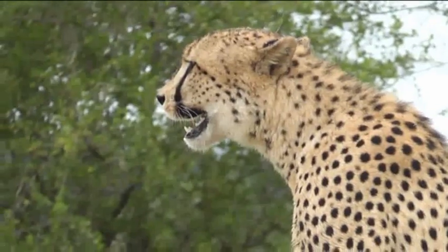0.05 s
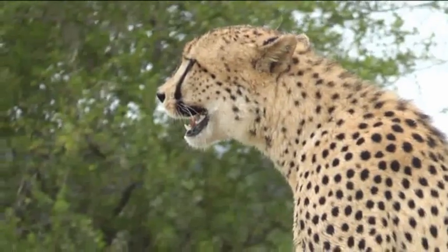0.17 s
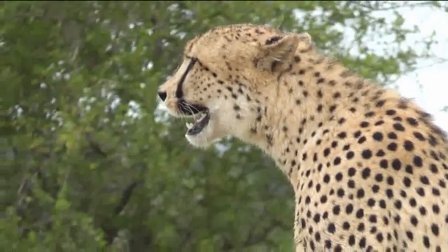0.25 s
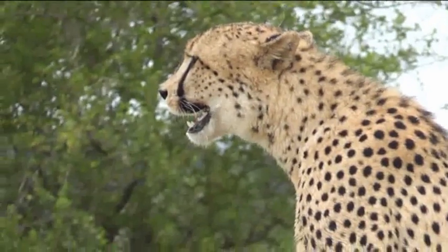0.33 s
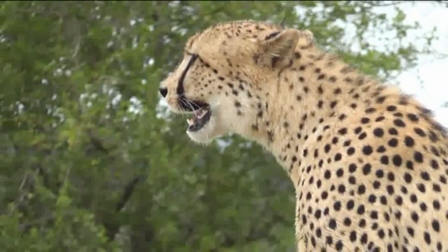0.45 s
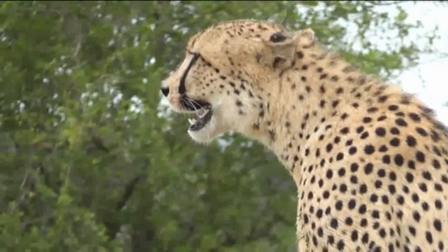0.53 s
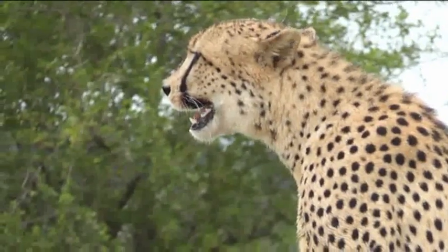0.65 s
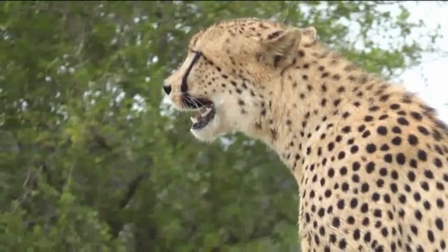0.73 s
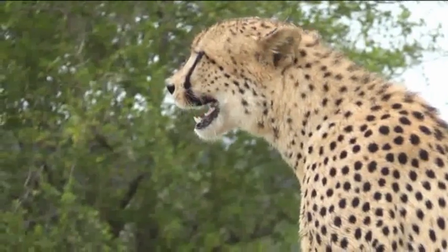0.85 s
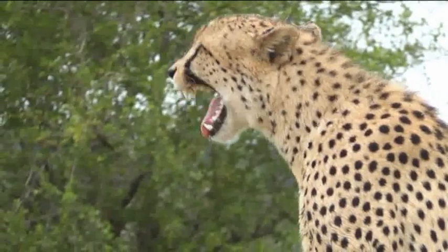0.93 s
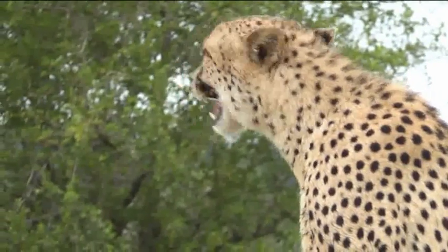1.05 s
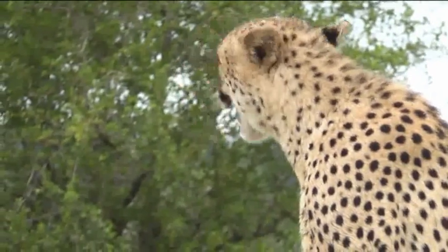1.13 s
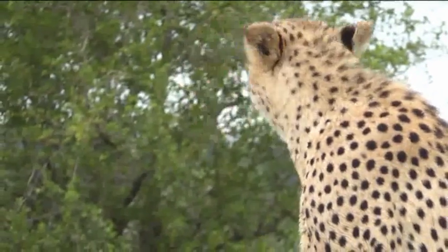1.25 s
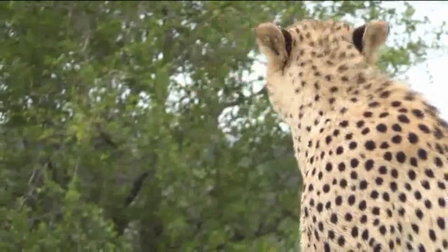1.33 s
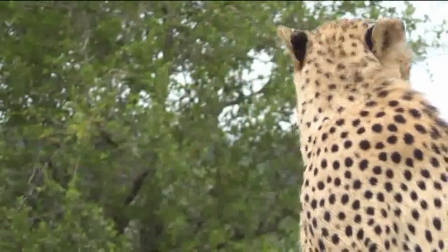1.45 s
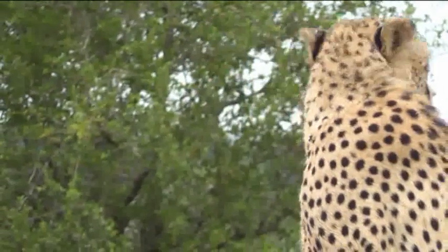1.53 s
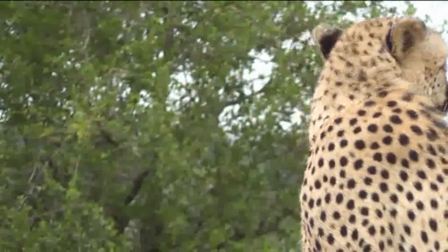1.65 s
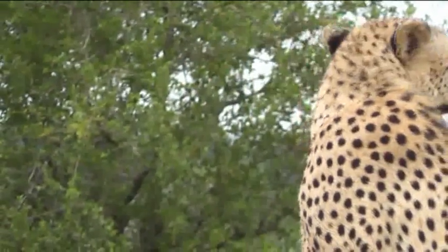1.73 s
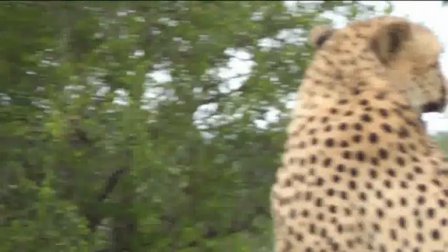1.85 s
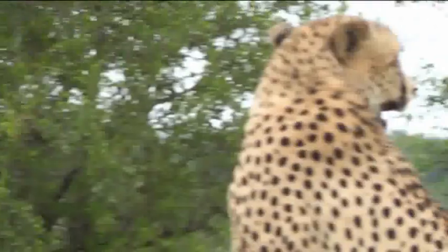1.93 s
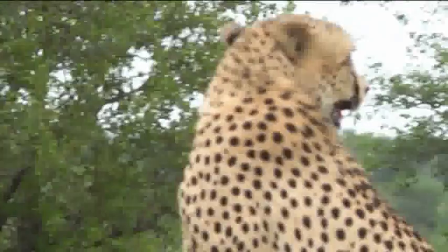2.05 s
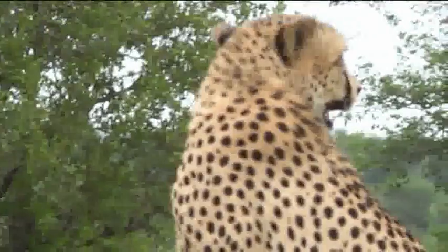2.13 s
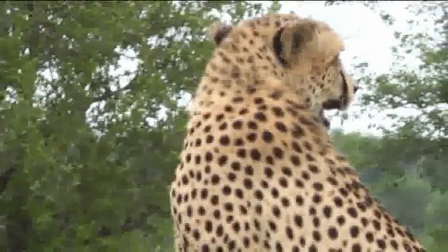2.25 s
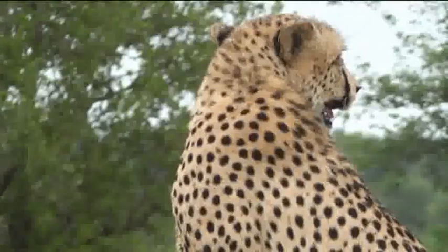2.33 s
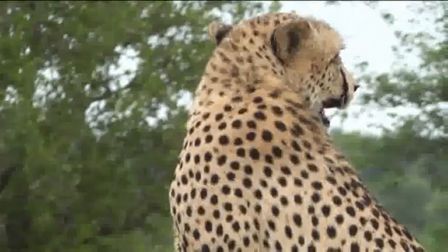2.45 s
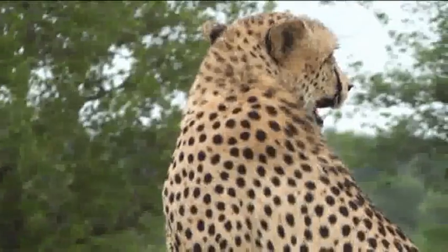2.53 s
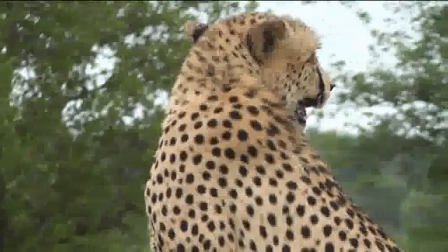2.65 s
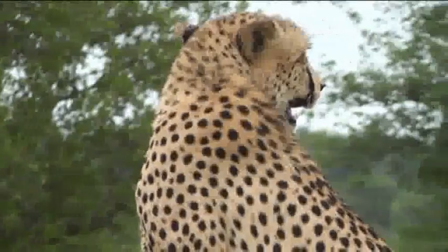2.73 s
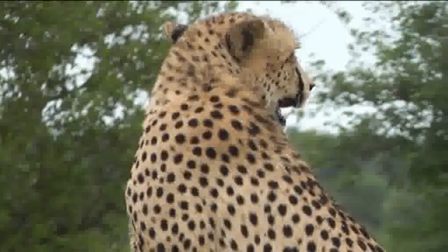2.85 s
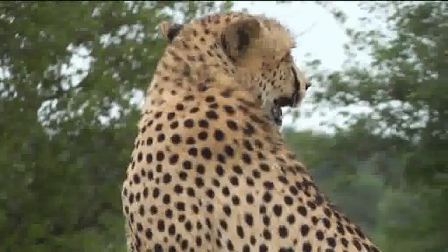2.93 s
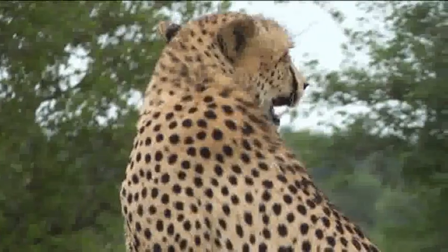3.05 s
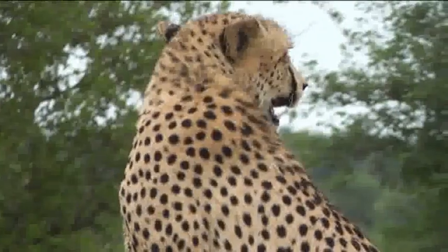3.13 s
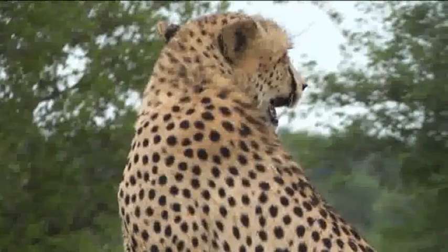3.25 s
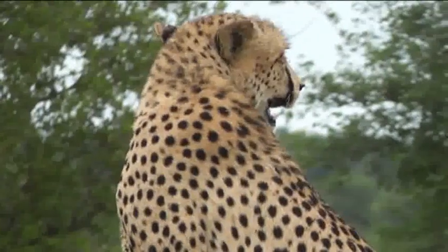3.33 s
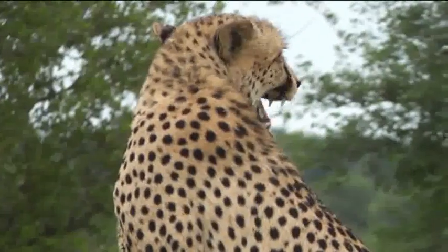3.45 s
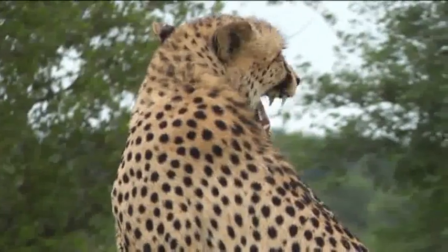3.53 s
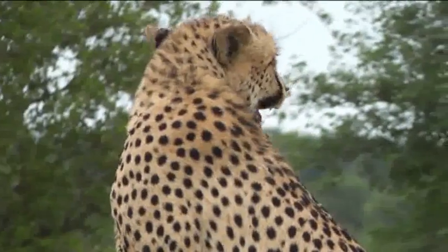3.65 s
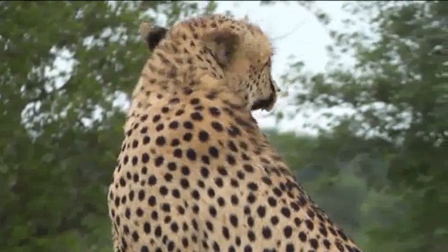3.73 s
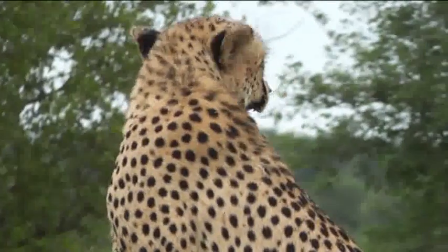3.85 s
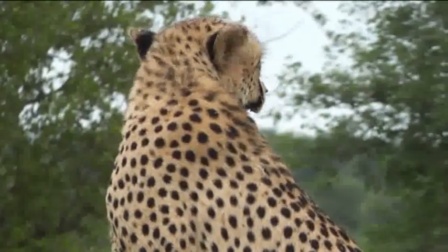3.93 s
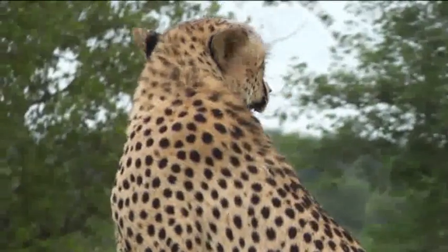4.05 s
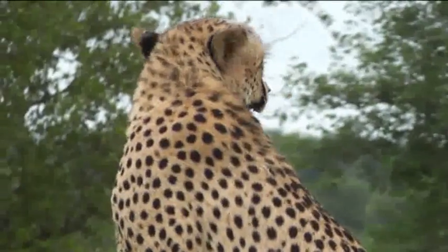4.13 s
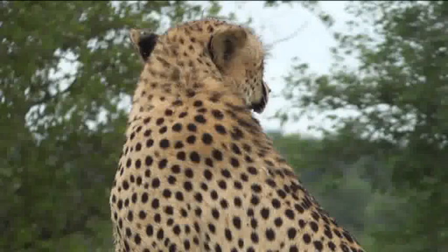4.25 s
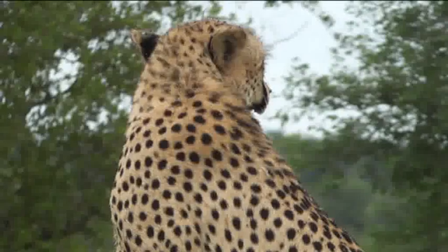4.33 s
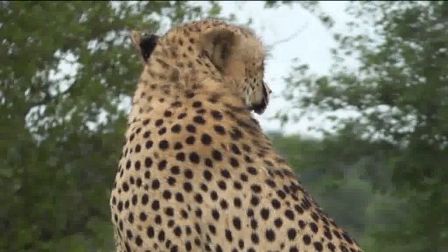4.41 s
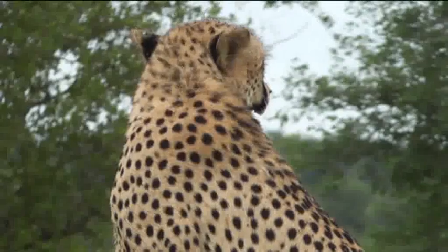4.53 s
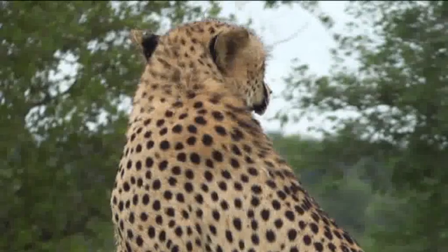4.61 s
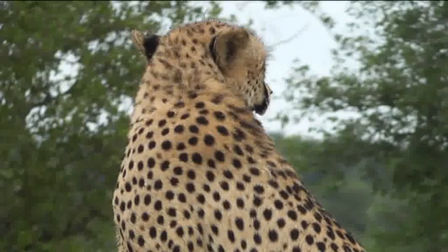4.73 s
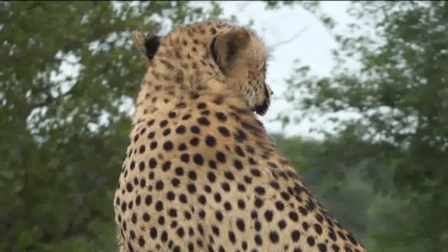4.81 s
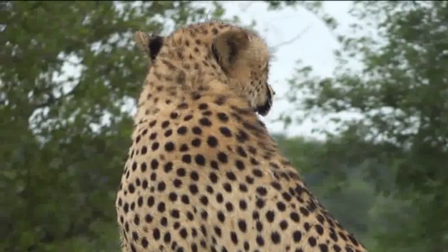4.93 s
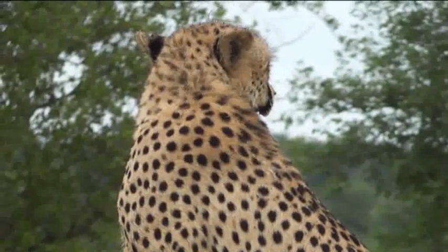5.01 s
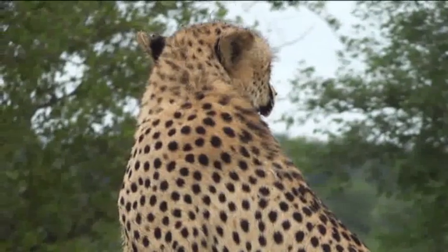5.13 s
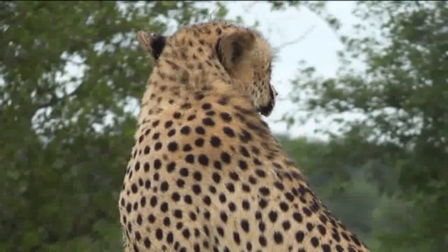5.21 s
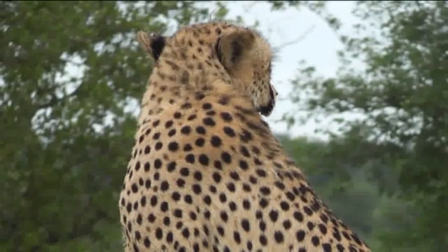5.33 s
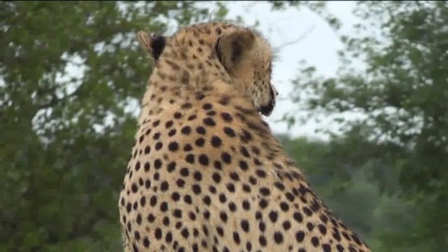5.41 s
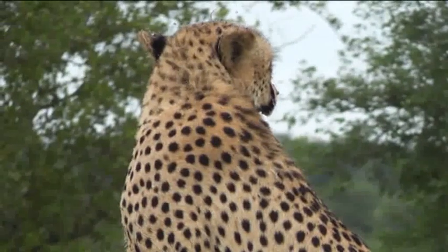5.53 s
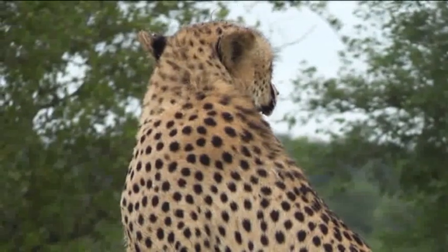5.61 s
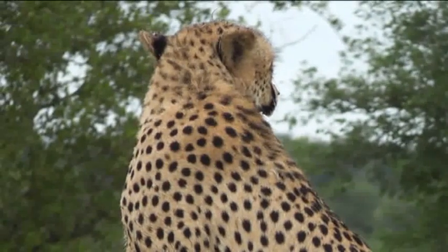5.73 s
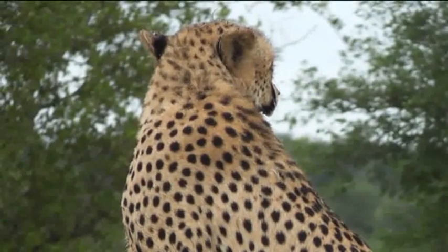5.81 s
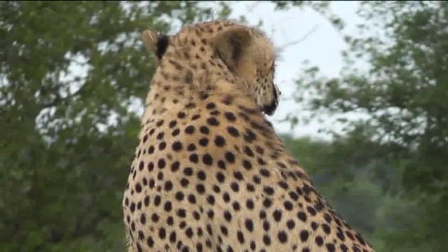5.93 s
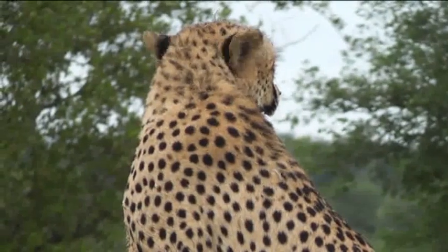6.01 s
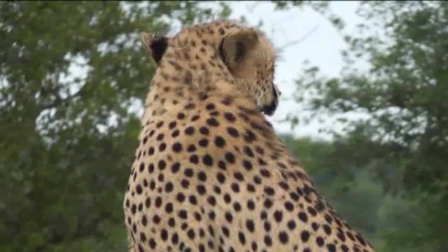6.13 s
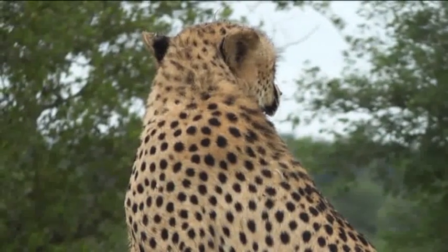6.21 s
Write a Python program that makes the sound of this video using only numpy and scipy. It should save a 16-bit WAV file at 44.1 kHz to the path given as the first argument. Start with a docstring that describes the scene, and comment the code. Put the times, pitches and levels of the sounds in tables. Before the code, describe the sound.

A cheetah close to the microphone gives two short, high, whistled chirps about two and a half seconds apart, each rising and falling in pitch like a bird call. The place is open bushland with only a slight echo. Far more quietly, a small bird trills three times and another drops thin falling notes, over a soft hiss of leaves and the drone of distant traffic.

```python
"""Cheetah chirping in open bushland

A cheetah's vocal folds give two short, whistled chirps, filtered by its mouth and reflected by nearby
surfaces and far trees. A small bird trills three times in rapid frequency sweeps; another drops thin
slurred notes. Behind them lie the wavering drone of far traffic and a soft hiss of air and leaves."""
import sys
import numpy as np
from scipy import signal
from scipy.fft import rfft, irfft
from scipy.io import wavfile
from scipy.ndimage import uniform_filter1d

SR = 44100
rng = np.random.default_rng(int(sys.argv[2]) if len(sys.argv) > 2 else 0)


def bounce(signal):
    """Save signal as a 16-bit WAV file at the path given by the first command-line argument."""
    frames = np.transpose(np.atleast_2d(signal))
    limited = np.clip(frames, -1, 1)
    pcm = np.round(limited * 32767).astype(np.int16)
    wavfile.write(sys.argv[1], SR, pcm)


N = 276507

# Pitch arches of the voice: (crest time [s], top pitch [Hz], end pitch [Hz], onset [s], rise [s],
# fall [s], swell before crest [s], hold after crest [s], source level [dB], tail gain [dB],
# mouth tuning [ratio])
CHEETAH_CHIRPS = [(1.104, 2239, 1070, 0.0024, .044, .089, 0.025, 0.078, -16, -8, 0.98),
                  (3.671, 2010, 1156, 0.0083, .050, .061, 0.024, .071, -19, 0.5, 0.94)]
# Near reflections, one list per chirp because the head turns: (delay [s], gain [dB])
NEAR_REFLECTIONS = [
    [(.0215, -16.5), (.032, -23), (.048, -17.5), (.068, -32)],
    [(.0235, -21), (.049, -22), (.071, -25), (.126, -36)],
]
def cheetah(beam_db=7):
    """Directivity: the mouth beams the octave outward, so reflections are brighter than the call."""
    t = np.arange(N) / SR
    out = 0
    for row, echoes in zip(CHEETAH_CHIRPS, NEAR_REFLECTIONS):
        tone, octave = chirp(*row)
        beamed = tone + undb(beam_db) * octave
        reflected = sum(undb(db) * np.interp(t - delay, t, beamed, left=0) for delay, db in echoes)
        out = out + tone + octave + reflected + bush(beamed)
    return out


# Open mouth, with a deep valley between its two main resonances: (frequency [Hz], gain [dB])
MOUTH_RESPONSE = [(950, -9.5), (1260, -4.5), (1460, -5.5), (1560, -11.5), (1760, -18), (1960, -4.5),
                  (2070, -0.5), (2260, -3.5), (2900, -1.5), (3700, -1.5), (4100, -16), (4500, -9.5)]
def chirp(crest, top_hz, end_hz, onset_s, rise_s, fall_s, swell_s, hold_s, db, tail_db, tuning,
          start_hz=980, hoarse_hz=1300, clear_hz=1750, catch_s=.012, full_s=.005, release_s=.018,
          catch_db=-25, lull_db=-22.5, rasp_db=-17, octave_db=-24, catch_octave_db=-8):
    """Source and filter: the folds run clean when tight and rasp when slack; the mouth resonates."""
    t = np.arange(N) / SR - crest
    rising, falling = np.clip(-t / rise_s, 0, 1), np.clip(t / fall_s, 0, 1)
    hz = top_hz - (top_hz - start_hz) * ease(rising ** 1.4) - (top_hz - end_hz) * ease(falling ** 1.02)
    slack = np.clip((clear_hz - hz) / 400, 0, 1)
    gate = np.clip((t + rise_s) / onset_s, 0, 1) * np.clip((hold_s - t) / release_s, 0, 1)
    sag_db = tail_db * ease((falling - .27) / .26)
    effort = gate * undb(db + sag_db + (.37 + .63 * slack) * walk(700))
    # The voice catches softly, almost stops, then swells to full just after the crest.
    catch = undb(catch_db) * np.exp(-((t + rise_s) / catch_s) ** 4)
    swell = np.clip((t + swell_s) / (swell_s + full_s), undb(lull_db), 1)
    jitter = (.0023 + .0196 * slack) * walk(900)
    phase = 2 * np.pi * np.cumsum(hz * (1 + jitter)) / SR
    rasp = undb(rasp_db) * slack * noise(lambda f: 1 / (1 + ((f - 1750) / 480) ** 4))
    tone = (catch + swell) * response(MOUTH_RESPONSE, hz / tuning) * (np.sin(phase) + rasp)
    # The catch loses its octave as the pitch climbs.
    hoarse = catch * ease((hoarse_hz - hz) / (hoarse_hz - start_hz))
    octave_gain = undb(catch_octave_db) * hoarse + undb(octave_db - sag_db / 2) * swell
    octave = octave_gain * response(MOUTH_RESPONSE, 2 * hz / tuning) * np.sin(2 * phase)
    return effort * tone, effort * octave * undb(2.5 * walk(300))


# Runs of notes: (last note time [s], note rate [1/s], relative level [dB], lead-in gain [dB],
# loud part length [s])
BIRD_TRILLS = [(1.2755, 57.3, -44.5, -11, .166), (3.099, 56.8, -44, -13.5, .148),
               (5.719, 57.0, -43.7, -13.5, .170)]
def birds(trill_db=-.2, slur_db=-3):
    """Direct-to-reverberant ratio: the close triller is drier than the bird deeper in the trees."""
    near = undb(trill_db) * sum(trill(*row) for row in BIRD_TRILLS)
    far = undb(slur_db) * slurs()
    return near + bush(near, near_db=-18, far_db=-28) + far + bush(far, near_db=-11, far_db=-23)


def trill(last, rate, db, soft_db, loud_s, low_hz=4060, soft_hz=4680, top_hz=5780, duty=.84, count=16):
    """Frequency modulation: quick downward sweeps grow louder and start higher as effort rises."""
    t = np.arange(N) / SR
    cycle = (t - last) * rate + .41
    along = np.clip(cycle % 1 / duty, 0, 1)
    effort = .5 + .5 * np.tanh((t - last + loud_s) / .014)
    reach = .5 + .5 * np.tanh((t - last + loud_s) / .041)  # the range opens more slowly than the level
    start_hz = soft_hz + (top_hz - soft_hz) * reach
    hz = (start_hz + (low_hz - start_hz) * along ** 1.35) * (1 + .006 * walk(200))
    singing = (cycle > 1 - count) & (cycle < 1)
    envelope = singing * np.interp(along, [0, .22, .45, .85, 1], [0, .76, .97, .68, .096])
    gain = undb(db + soft_db * (1 - effort) + walk(350))
    return envelope * gain * np.sin(2 * np.pi * np.cumsum(hz) / SR)


# Falling notes: (start [s], length [s], starting pitch [Hz], relative level [dB])
SLURRED_NOTES = [(0, 0.0395, 3020, -60), (0.386, .065, 3410, -56.5), (.388, 0.027, 5900, -57.5),
                 (.929, 0.063, 3650, -56.5), (1.313, 0.066, 3750, -56.5), (1.678, 0.058, 3770, -49.5),
                 (3.863, .07, 3900, -54.5), (4.324, .07, 3850, -55.5), (4.784, 0.075, 3720, -50),
                 (5.131, 0.058, 3700, -50), (5.179, .07, 3350, -57), (5.25, 0.068, 5350, -55),
                 (5.42, .11, 3420, -52), (5.667, 0.091, 3290, -52), (5.759, .07, 5100, -56),
                 (6.132, .022, 3200, -54)]
# One nearly level note: (start [s], length [s], pitch [Hz], relative level [dB], end pitch [ratio])
LEVEL_NOTE = (1.024, .062, 4200, -55, .95)
def slurs(end_ratio=.78):
    """Exponential glide: thin pure tones swell and fade as their pitch drops."""
    t = np.arange(N) / SR
    out = np.zeros(N)
    waver, flutter = 1 + .0081 * walk(200), undb(1.6 * walk(150))
    for start, length, from_hz, db, drop in [(*row, end_ratio) for row in SLURRED_NOTES] + [LEVEL_NOTE]:
        on = (t > start) & (t < start + length)
        along = (t[on] - start) / length
        hz = from_hz * drop ** along * waver[on]
        envelope = np.sin(np.pi * along) ** (2 / 3)
        out[on] += undb(db) * envelope * np.sin(2 * np.pi * np.cumsum(hz) / SR)
    return out * flutter


def bush(x, near_db=-25, near_t60=.26, far_db=-33.5, far_t60=1.9):
    """Reverberation by scattering: a short decay from close branches, a faint long one from far trees."""
    t = np.arange(SR) / SR
    impulse_response = 0
    for db, t60, rise_s in ((near_db, near_t60, .014), (far_db, far_t60, .12)):
        build_up = np.clip(t / rise_s - .5, 0, 1)
        tail = rng.standard_normal(SR) * np.exp(-np.log(1000) * t / t60) * build_up
        impulse_response += undb(db) * tail / np.sqrt(np.sum(tail ** 2))
    return signal.fftconvolve(x, impulse_response)[:N]


# Bands in which the tyres sing: (centre [Hz], width [Hz], relative level [dB])
TYRE_BANDS = [(548, 89, -5.5), (831, 108, 0), (1078, 81, -0.5), (1245, 38, -4.5)]
# Broad roar of the road: (frequency [Hz], relative spectral density [dB])
ROAD_SPECTRUM = [(20, -39), (80, -10), (180, -11.5), (240, -4), (400, -1.5), (750, -1.5), (1200, 0.5),
                 (1600, -1.5), (2100, -4), (3500, -3.5), (6000, -34)]
# Whine of far traffic: (time [s], pitch [Hz], level [dB])
TRAFFIC_WHINE = [(0.0, 573, -78), (0.03, 555.4, -67), (0.5, 565, -67.5), (2.01, 537.3, -72),
                 (3.42, 564.4, -63.5), (3.98, 538.2, -81), (4.07, 488, -66), (4.43, 514.8, -64),
                 (4.54, 485.6, -71), (4.99, 565.2, -61), (5.73, 529, -73.5), (6.27, 560, -65)]
# Hum of a far engine: (time [s], pitch [Hz], relative level [dB])
ENGINE_HUM = [(0.0, 266.8, -84), (0.45, 284.5, -86), (0.79, 248.3, -81.5), (4.24, 274.5, -74),
              (4.31, 299, -69.5), (5.41, 261.5, -78.5), (5.55, 244, -78), (6.27, 286.1, -85)]
def traffic(level_db, road_db=2, tyres_db=1, hum_db=-1):
    """Superposition: a broadband roar, tyre bands that fade in and out on the way, a whine and a hum."""
    tyres = sum(undb(db + 2.9 * walk(6.2)) * band(hz, width) for hz, width, db in TYRE_BANDS)
    roar = undb(road_db) * coloured(ROAD_SPECTRUM) + undb(tyres_db) * tyres / tyres.std()
    whine = drone(*curves(TRAFFIC_WHINE))
    hum = undb(hum_db) * drone(*curves(ENGINE_HUM))
    return undb(level_db) * roar + whine + hum


def drone(hz, db, waver=.00815, fade_db=1.5):
    """Atmospheric fading: a distant tone wavers in pitch and level in the moving air."""
    phase = 2 * np.pi * np.cumsum(hz * (1 + waver * walk(40))) / SR
    return undb(db + fade_db * walk(13)) * np.sin(phase)


# Hiss of air and leaves: (frequency [Hz], relative spectral density [dB])
HISS_SPECTRUM = [(100, -11), (500, -2), (1500, 0.5), (2200, 1), (2800, 3.5), (3800, 7), (4600, 3),
                 (5800, -1), (7500, -1), (8900, -1.5), (10000, -5), (10800, -17.5), (12000, -20)]
# Thin distant ring: (time [s], level [dB])
RING_LEVELS = [(0.0, -84), (2.36, -69), (2.67, -74.5), (3.91, -65), (4.24, -64.5), (4.59, -60.5),
               (4.98, -66.5), (6.27, -65.5)]
# Low rumble of the air: (frequency [Hz], relative spectral density [dB])
RUMBLE_SPECTRUM = [(10, -2.5), (22, 3.5), (32, 5.5), (45, -5), (70, -23), (200, -40), (600, -81)]
def air(level_db, hiss_db=8, ring_hz=2440, ring_width_hz=180, rumble_db=-76):
    """Amplitude-modulated noise: a smooth hiss, a narrowband ring and a slowly heaving rumble."""
    hiss = undb(level_db + hiss_db + .33 * walk(7.3)) * coloured(HISS_SPECTRUM)
    ring = undb(curves(RING_LEVELS)[0] + 2.5 * walk(6)) * band(ring_hz, ring_width_hz)
    rumble = undb(rumble_db + walk(3)) * coloured(RUMBLE_SPECTRUM)
    return hiss + ring + rumble


def noise(gain):
    """Spectral shaping: white noise weighted by a function of frequency, scaled to rms 1."""
    hz = np.arange(N // 2 + 1) * SR / N + 1
    shaped = irfft(rfft(rng.standard_normal(N)) * gain(hz), N)
    return shaped / shaped.std()


def band(hz, width):
    """Resonance: noise concentrated around one frequency."""
    return noise(lambda f: 1 / (1 + ((f - hz) / (.61 * width)) ** 2))


def coloured(points):
    """Coloured noise: its spectrum follows (frequency [Hz], relative level [dB]) points."""
    return noise(lambda f: response(points, f))


def response(points, f):
    """Frequency response: the gain at f, interpolated in decibels over log frequency."""
    hz, db = np.transpose(points)
    return undb(np.interp(np.log(f), np.log(hz), db))


def walk(rate):
    """Random modulation: values held for 1 / rate seconds, smoothed twice, scaled to unit spread."""
    hold = max(int(SR / rate), 2)
    steps = np.repeat(rng.standard_normal(N // hold + 1), hold)
    smooth = uniform_filter1d(uniform_filter1d(steps, hold), hold)[:N]
    return smooth / smooth.std()


def curves(rows):
    """Linear interpolation: each later column of a table as a curve over the times in the first."""
    times, *columns = np.transpose(rows)
    return [np.interp(np.arange(N) / SR, times, column) for column in columns]


def ease(u):
    """Raised cosine: a smooth step from 0 to 1."""
    return np.sin(np.pi / 2 * np.clip(u, 0, 1)) ** 2


def undb(db):
    """Decibel scale: level to amplitude ratio."""
    return 10 ** (np.asarray(db) / 20)


# Slow drift of the background: (time [s], relative roar level [dB], relative hiss level [dB])
BACKGROUND_LEVELS = [(0.0, -64.5, -71.5), (0.59, -65.5, -71.5), (1.87, -62, -66.5), (2.44, -63, -67),
                     (3.35, -63, -68), (3.81, -61, -65), (4.5, -61.5, -65.5), (4.8, -61, -65.5),
                     (5.06, -61.5, -66.5), (5.95, -62, -67.5), (6.27, -61, -68.5)]
def scene():
    """Superposition: the cheetah in front and the birds, traffic and air behind add in one channel."""
    roar_db, hiss_db = curves(BACKGROUND_LEVELS)
    return (cheetah() + birds() + traffic(roar_db) + air(hiss_db))[None]


def record(dry, cutoff_hz=11200):
    """Band limiting: a steep elliptic low-pass filter removes the highest treble."""
    return signal.sosfilt(signal.ellip(8, .2, 70, cutoff_hz, fs=SR, output="sos"), dry)


dry = scene()
out = record(dry)
bounce(out)
```